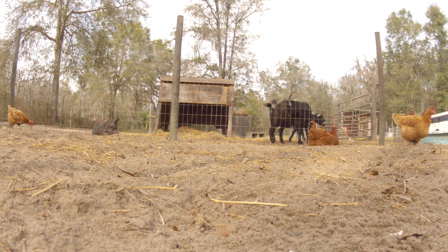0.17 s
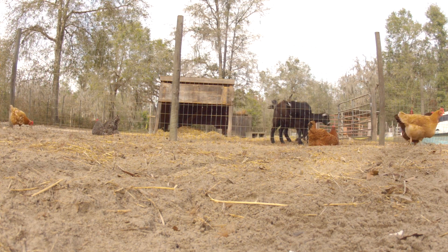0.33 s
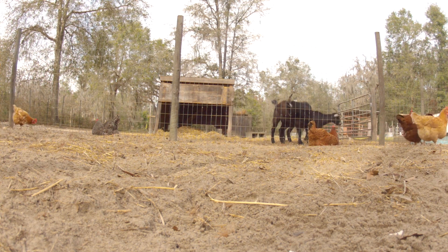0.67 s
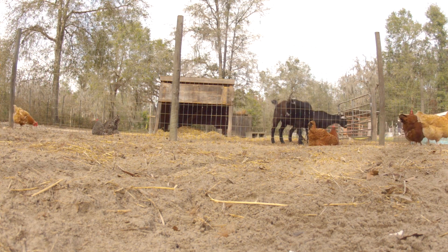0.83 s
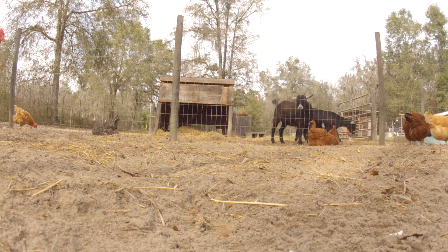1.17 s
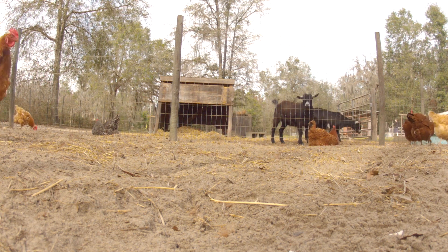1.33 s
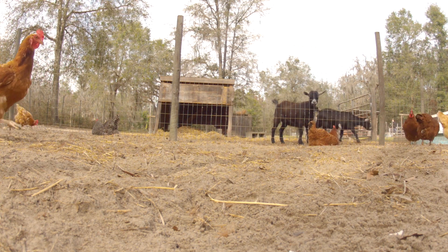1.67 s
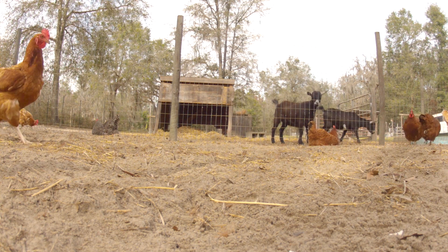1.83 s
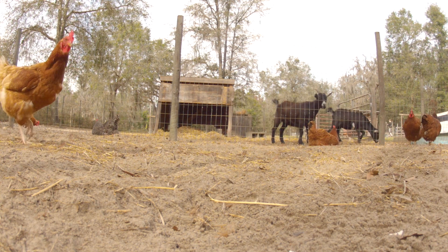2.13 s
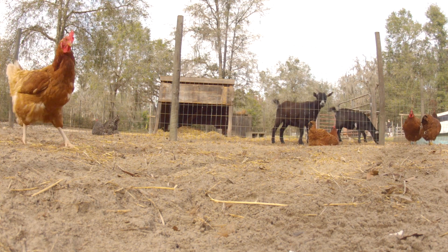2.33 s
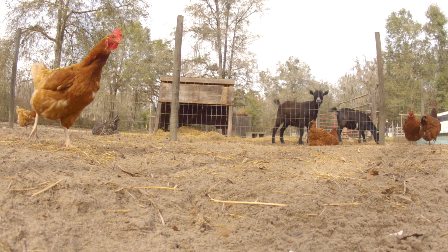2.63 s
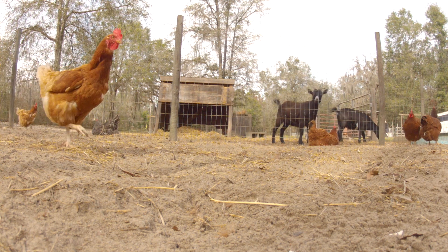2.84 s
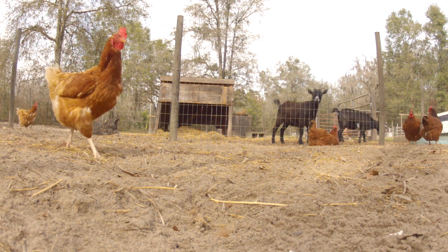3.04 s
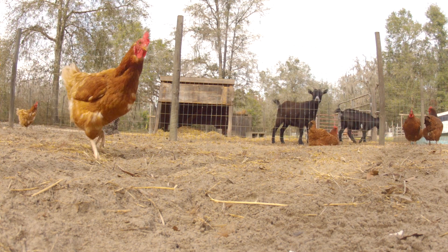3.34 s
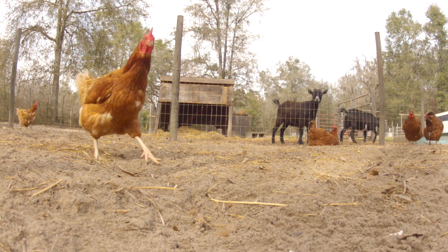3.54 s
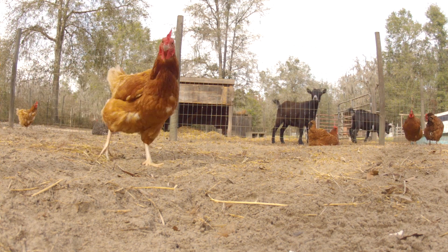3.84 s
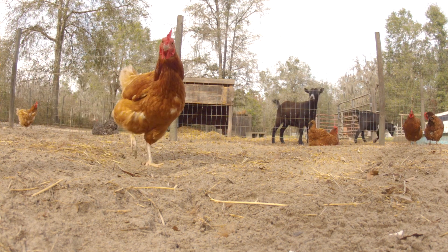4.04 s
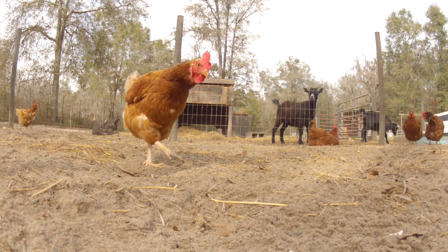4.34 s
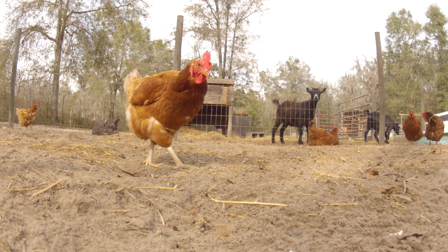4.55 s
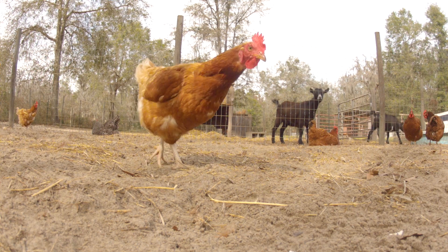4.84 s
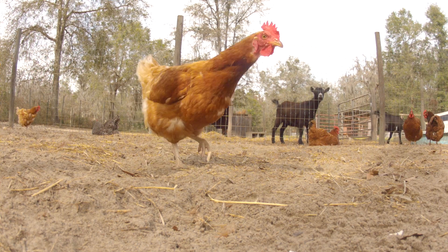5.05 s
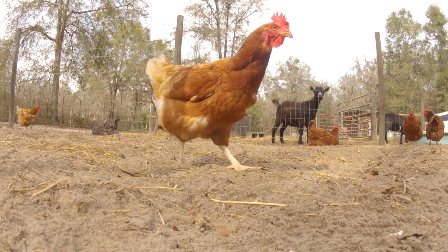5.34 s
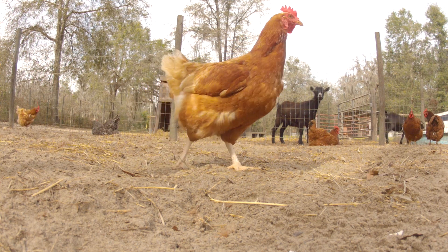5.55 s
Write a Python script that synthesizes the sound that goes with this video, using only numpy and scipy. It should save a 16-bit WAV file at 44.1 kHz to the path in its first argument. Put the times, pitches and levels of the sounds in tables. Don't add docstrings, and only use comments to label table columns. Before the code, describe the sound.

In an open farmyard a single hen vocalises close to the microphone: first a drawn-out creaky moan that cracks and breaks off, then a bright rising call, a steady run of short throaty clucks, and finally six raspy calls, some short and some longer. Thin whistles and little falling grunts slip in. Soft low rumble lies underneath; the cheap camera sound is nasal with gritty mirrored treble.

```python
import sys
import numpy as np
from scipy import signal
from scipy.io import wavfile
from scipy.ndimage import uniform_filter1d

SR = 44100
rng = np.random.default_rng(int(sys.argv[2]) if len(sys.argv) > 2 else 0)


def store_pcm(level_fs):
    pcm = np.round(np.clip(level_fs, -1, 1) * 32767).astype(np.int16)
    wavfile.write(sys.argv[1], SR, np.atleast_2d(pcm).T)


def how_loud(loudness_db):
    steps = np.asarray(loudness_db, float) / 20
    return 10 ** steps


N = 250929
USUAL_DB = -48.5


def evened(x):
    return x / np.sqrt(np.mean(x ** 2) + 1e-20)


def steady(x, size):
    return x / np.sqrt(uniform_filter1d(x ** 2, size=size) + 1e-12)


def read(points, hz):
    f, value = np.transpose(points)
    return np.interp(np.log(hz + 1), np.log(f + 1), value)


def unroll(start, length):
    at = np.arange(round(start * SR), min(round((start + length) * SR), N))
    t = np.clip(at / SR - start, 0, length)
    return at, t, t / length


def colour(x, points, size=4096):
    hz = abs(np.fft.fftfreq(size, 1 / SR))
    log_gain = read(points, hz) * np.log(10) / 20
    response = np.exp(np.conj(signal.hilbert(log_gain)))
    taps = np.fft.ifft(response).real[:size // 2]
    return signal.oaconvolve(x, taps)[:len(x)]


def noise(points, patchy_db):
    a, b, patches = rng.standard_normal((N // 1024 + 5, 2049, 3)).T
    patches = uniform_filter1d(patches, size=20, axis=0)
    patches = evened(uniform_filter1d(patches, size=3, axis=1))
    shape_db = read(points, np.fft.rfftfreq(4096, 1 / SR))[:, None]
    spectra = (a + 1j * b) * how_loud(shape_db + patchy_db * patches)
    return evened(signal.istft(spectra, nperseg=4096, noverlap=3072)[1][:N])


def shaped(rows, kind):
    edge_swing_db = -15
    calls = []
    for start, length, level_db, from_hz, to_hz in rows:
        _, t, along = unroll(start, length)
        left_s = length - t
        rise = np.clip(1 - t / kind["rise_s"], 0, 1)
        fall = np.clip(1 - left_s / kind["fall_s"], 0, 1)
        effort_db = level_db + kind["swell_db"] * (along - 1) + edge_swing_db * np.maximum(rise, fall)
        glide_hz = from_hz + (to_hz - from_hz) * along ** kind["bend"]
        sagging = kind["sag"] * np.exp(-left_s / kind["fall_s"])
        calls.append((start, length, effort_db, glide_hz * (1 - sagging), 0))
    return calls


def traced(curves):
    calls = []
    for s, *columns in map(np.transpose, curves):
        start, length = s[0], s[-1] - s[0]
        now = unroll(start, length)[0] / SR
        calls.append((start, length, *(np.interp(now, s, c) for c in columns)))
    return calls


def phrase(start, length, effort_db, hz, slip_db, kind):
    at, t, along = unroll(start, length)
    extra_db = effort_db - USUAL_DB
    first_db = np.interp(along, (0, 1), kind["first_db"]) + kind["follows"] * extra_db - 0.65 * slip_db
    uneven_db = np.interp(along, (0, 1), kind["uneven_db"]) - 0.19 * extra_db + slip_db
    share = kind["share"] + 0.04 * slip_db
    beak_db = kind["beak_db"] + kind["shut_db"] * np.exp(-t / kind["open_s"])
    return at, (effort_db, hz, first_db, uneven_db, share, beak_db)


def hen(calls, kind, windpipe, jitter, breath, depth_db):
    # t/s, added roughness [1], change of effort/dB
    catches = [(.15, 0.67, -13), (0.188, 0.71, -11), (0.242, 0.75, -8), (0.278, 0.72, -1),
               (0.325, 0.7, -10), (0.413, 1.13, -5.5), (0.494, 1.15, -3), (0.561, 0.68, -2.5),
               (0.614, 0.79, 0), (.72, 0.63, 3), (0.773, 0.41, -3.5), (.83, 0.95, 2.5), (0.934, 1.07, 2.5),
               (.99, 1.1, 2.5), (1.218, 0.93, -0.5), (1.298, 0.77, 0), (3.165, 0.64, -5), (3.5, .5, -1),
               (4.182, 0.85, -0.5), (4.241, .6, -5), (4.271, 0.56, 0.5), (4.695, 0.56, -5),
               (4.751, 0.36, 0.5), (4.9, 0.35, 0)]
    catch_s, dip_s, lag = 0.00654, 0.0067, 3.65
    out = np.zeros(N)
    wobble = evened(uniform_filter1d(rng.standard_normal(N), size=150))
    air = rng.standard_normal(N)
    chance = signal.lfilter([.9, -.45], 1, rng.standard_normal((len(calls), 500)))
    for row, luck in zip(calls, chance):
        at, (effort_db, hz, first_db, uneven_db, share, beak_db) = phrase(*row, kind)
        now = at / SR
        depth = np.minimum(how_loud(uneven_db + depth_db), 1.6)
        share = np.clip(share, 0, 1)
        catch = sum(added * np.exp(-((now - s) / catch_s) ** 2) for s, added, _ in catches)
        dip_db = sum(db * np.exp(-((now - s) / dip_s) ** 2) for s, _, db in catches)
        rough = depth * (1 - share) + catch

        turns = np.cumsum(hz * (1 + jitter * rough * wobble[at])) / SR
        cycle = np.round(turns).astype(int)
        pulse_size = 1 + depth * share * (-1.) ** cycle + rough * luck[cycle]
        pulses = pulse_size * evened(sum(np.cos(2 * np.pi * k * turns) for k in range(2, 13)))
        rung = colour(pulses + breath * rough * air[at], windpipe)

        above = signal.butter(6, 1030, "high", fs=SR, output="sos")
        upper = signal.sosfiltfilt(above, rung)
        lower = steady(rung - upper, size=450)
        rung = lower + how_loud(np.minimum(beak_db, -10)) * steady(upper, size=900)

        line = np.linspace(turns[0], turns[-1], len(turns))
        smooth_turns = uniform_filter1d(turns - line, size=450) + line
        first = np.sqrt(2) * np.cos(2 * np.pi * smooth_turns - lag)
        first *= 1 + .25 * rough * uniform_filter1d(luck[cycle], size=200)

        call = how_loud(effort_db + dip_db) * rung + how_loud(first_db + 0.25 * dip_db) * first
        out[at] += (at >= 0) * call * signal.windows.tukey(len(at), 300 / len(at))
    return out


def opening_calls():
    # f/Hz, level/dB
    stretched = [(200, -19.5), (320, 1.5), (450, -1), (550, 2.5), (650, -10), (790, -7.5), (920, -11),
                 (1030, -34), (1170, -25), (1500, -36.5), (2100, -30.5), (2550, -50), (3080, -26.5),
                 (3600, -43)]
    # t/s, effort/dB, f/Hz, added unevenness/dB
    opening = [
        [(.13, -63.5, 398.3, -1), (.16, -51, 385.5, -1.5), (.22, -50, 380, -2.5), (.3, -52.5, 374.5, 1.5),
         (.45, -49, 391.7, 1), (.6, -46.5, 388.9, -1), (.65, -48.5, 375.8, -3.2), (.75, -47, 381, -5),
         (.822, -47, 385.5, 2.5)],
        [(.818, -47, 403, 2), (.85, -46.5, 382.7, -1.5), (.945, -46, 420.4, 1.5), (1.02, -46, 407, 3),
         (1.048, -48, 381, 13), (1.072, -65, 332, -7)],
    ]
    # start t/s, length/s, effort/dB, start f/Hz, end f/Hz
    clear = [
        (-.06, 0.083, -51, 355, 365),
        (1.174, 0.1995, -44.5, 371.7, 408.8),
    ]
    straining = dict(first_db=(-51.5, -50.5), follows=0.28, uneven_db=(-11, -6.5), share=0.332,
                     beak_db=-18.5, shut_db=-3, open_s=0.3)
    ringing = dict(rise_s=.007, fall_s=.014, swell_db=3.5, bend=1.104, sag=0.089,
                   first_db=(-51, -49), follows=0.54, uneven_db=(-9.5, -13), share=0.42,
                   beak_db=-23, shut_db=1, open_s=.012)
    voice = hen(traced(opening), straining, stretched, jitter=0.14, breath=0.69, depth_db=2.5)
    voice += hen(shaped(clear, ringing), ringing, stretched, jitter=0.158, breath=0.57, depth_db=3.0)
    return voice


def yard_rumble():
    # f/Hz, level/dB per Hz
    yard = [(12, -38), (20, -13), (65, -11.5), (98, -5.5), (141, -9.5), (196, -8), (218, -15.5), (249, -14),
            (265, -15), (392, -21.5), (957, -31), (1380, -34), (2090, -35.5), (2660, -36), (3600, -37.5),
            (4680, -31.5), (7920, -120)]
    return how_loud(-56) * noise(yard, patchy_db=1.0)


def input_hiss():
    # f/Hz, level/dB per Hz
    hiss = [(20, 4), (40, 15), (100, 9), (250, 4.5), (500, -8), (2000, -2), (3600, -2)]
    return how_loud(-73.5) * noise(hiss, patchy_db=-2.0)


def whistles():
    # start t/s, length/s, level/dB, start f/Hz, end f/Hz
    glides = [
        (.018, .16, -55.5, 567, 580),
        (0.138, 0.071, -61, 573, 575),
        (0.73, 0.095, -63.5, 582, 780),
        (1.15, 0.032, -56, 545, 530),
        (1.453, 0.035, -55, 520, 570),
        (1.652, 0.032, -59.5, 490, 570),
        (0.814, 0.054, -56.5, 321, 139),
        (5.042, .064, -54, 332.5, 200),
        (5.167, 0.052, -58, 327, 215),
    ]
    out = np.zeros(N)
    for start, length, db, from_hz, to_hz in glides:
        at, t, along = unroll(start, length)
        hz = from_hz + (to_hz - from_hz) * along
        tone = np.sqrt(2) * np.sin(2 * np.pi * np.cumsum(hz) / SR)
        swell = np.clip(np.minimum(t / 0.012, (1 - along) / .25), 0, 1)
        out[at] += how_loud(db) * tone * swell
    return out


def short_clucks():
    # f/Hz, level/dB
    jerked = [(200, -38), (320, 11.5), (450, 6), (560, -3), (680, -1), (770, 6), (920, -11), (1030, -21.5),
              (1230, -18), (1500, -31.5), (2100, -23), (2600, -34), (3250, -21.5), (3900, -45)]
    # start t/s, length/s, effort/dB, start f/Hz, end f/Hz
    high = [
        (1.474, 0.088, -47, 384.6, 333),
        (1.678, 0.054, -47.5, 368, 338.3),
        (1.878, 0.054, -48, 353, 339.3),
    ]
    # start t/s, length/s, effort/dB, start f/Hz, end f/Hz
    low = [
        (2.104, 0.064, -50.5, 324, 342),
        (2.331, 0.077, -50, 325, 328),
        (2.55, 0.0852, -51, 322.8, 340),
        (2.807, 0.12, -49.5, 337.3, 321.3),
    ]
    jerking = dict(rise_s=0.013, fall_s=0.008, swell_db=-1.5, bend=0.605, sag=0.016,
                   first_db=(-56, -50.5), follows=0.12, uneven_db=(-7.5, -6), share=0.256,
                   beak_db=-21.5, shut_db=-7, open_s=.02)
    snapping = dict(rise_s=0.0092, fall_s=0.0064, swell_db=-1.5, bend=0.94, sag=0.013,
                    first_db=(-53.5, -50.5), follows=0.15, uneven_db=(-10, -8.5), share=0.306,
                    beak_db=-18.5, shut_db=-3, open_s=0.042)
    voice = hen(shaped(high, jerking), jerking, jerked, jitter=0.118, breath=1.0, depth_db=8.0)
    voice += hen(shaped(low, snapping), snapping, jerked, jitter=0.121, breath=1.0, depth_db=7.5)
    return voice


def hoarse_calls():
    # f/Hz, level/dB
    lowered = [(250, -9.5), (450, 6), (540, 7.5), (620, -4.5), (720, 4), (880, -2), (1030, -30),
               (1230, -13), (1500, -32), (2050, -35), (2270, -22.5), (2500, -57), (3300, -38.5),
               (4200, -24)]
    # t/s, effort/dB, f/Hz, added unevenness/dB
    earlier = [
        [(3.12, -70, 333, -6), (3.13, -48.5, 335.4, -6.5), (3.16, -47.5, 326, 4.5), (3.192, -48.5, 379, 2),
         (3.218, -49, 353, 2), (3.236, -73, 327, 2)],
        [(3.44, -57, 285, .1), (3.466, -50.5, 294, 1), (3.51, -50, 328.5, 0.87), (3.628, -50, 347.5, 0.6),
         (3.675, -55.5, 325, .1), (3.705, -76, 283, .1)],
        [(3.913, -60.5, 321.6, 5), (3.945, -49.5, 345.2, 2.5), (3.995, -58, 360.7, -8.5),
         (4.04, -50.5, 347.2, .5), (4.19, -47.5, 354.8, 0.5), (4.3, -49, 356.5, -2), (4.33, -47, 321, 3),
         (4.347, -79, 296.8, -12)],
    ]
    # t/s, effort/dB, f/Hz, added unevenness/dB
    later = [
        [(4.645, -56.5, 325, -13), (4.665, -51.5, 325.3, -1.5), (4.82, -49.5, 356.5, -1), (4.97, -48, 364, 2),
         (5.01, -49.5, 385, 1), (5.035, -48, 349.3, 0.2), (5.055, -63.5, 291.3, 6.5), (5.104, -63, 232, 9)],
        [(5.102, -66.5, 287.5, 6), (5.114, -50.5, 325, -2.5), (5.14, -47, 351.7, -3), (5.18, -53.5, 336.5, -1),
         (5.214, -66, 239, 2)],
        [(5.466, -63, 319.6, 1), (5.496, -49.5, 302, 1), (5.516, -58, 313, -5.5), (5.534, -49.5, 338.3, .1),
         (5.6, -49.5, 338.3, -2), (5.676, -49.5, 346.6, 1), (5.69, -65, 370, -1)],
    ]
    rasping = dict(first_db=(-54, -50), follows=0.75, uneven_db=(-6, -7.5), share=.65,
                   beak_db=-13.5, shut_db=-10, open_s=0.076)
    return hen(traced(earlier + later), rasping, lowered, jitter=0.1306, breath=0.64, depth_db=10.0)


def sheds(x, t60):
    t = np.arange(SR // 4) / SR
    signs = rng.choice([-1., 1.], len(t))
    hits = rng.random(len(t)) < 1500 / SR
    taps = signs * hits * (t > .006) * how_loud(-60 * t / t60)
    return signal.oaconvolve(x, taps / np.linalg.norm(taps))[:N]


def scene():
    voice = opening_calls() + short_clucks() + hoarse_calls() + whistles()
    shared = voice + how_loud(-13.5) * sheds(voice, t60=0.18) + yard_rumble()
    hiss = input_hiss()
    return np.array([shared + hiss, shared - hiss])


def slow_sampling(dry):
    slow_rate, hold = 8000, 4
    low_pass = signal.firwin(121, 3720, window=("kaiser", 3.5), fs=SR)
    smooth = signal.oaconvolve(dry, low_pass[None], "same")
    slow = signal.resample(smooth, round(N * slow_rate / SR), axis=1)
    slow = slow + how_loud(-92) * rng.standard_normal(slow.shape[1])
    held = np.repeat(slow, hold, axis=1)
    return signal.resample(held, N, axis=1)


def thrift(x, from_hz, edge_hz, keep_db):
    hz, _, z = signal.stft(x, SR, nperseg=2048)
    power = abs(z) ** 2
    patch_db = 10 * np.log10(uniform_filter1d(power, size=9, axis=0) + 1e-20)
    loud_db = 10 * np.log10(power.sum(0) + 1e-12) + 56
    limit_db = keep_db + .3 * np.clip(loud_db, 0, 10) + ((hz - 13500) / 1000)[:, None]
    keep = (patch_db > limit_db) | (hz < from_hz)[:, None]
    keep = keep & (hz < edge_hz)[:, None]
    return signal.istft(z * keep, SR, nperseg=2048)[1][:N]


def top_cut(x):
    return signal.sosfilt(signal.butter(12, 15650, fs=SR, output="sos"), x)


def record(dry):
    left, right = slow_sampling(dry)
    mid = thrift((left + right) / 2, from_hz=11850, edge_hz=15330, keep_db=-112)
    side = thrift((left - right) / 2, from_hz=4300, edge_hz=6800, keep_db=-114)
    return top_cut(np.array([mid + side, mid - side]))


dry = scene()
out = record(dry)
store_pcm(out)
```